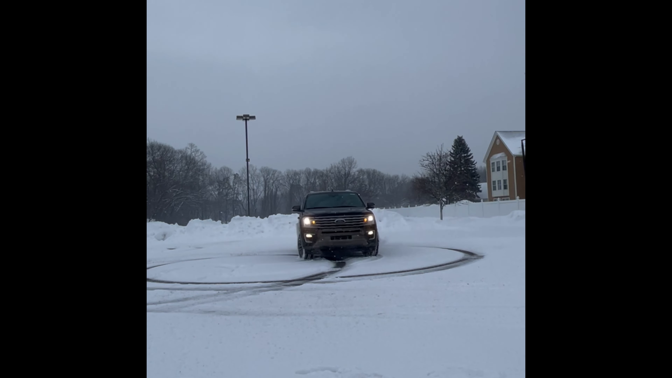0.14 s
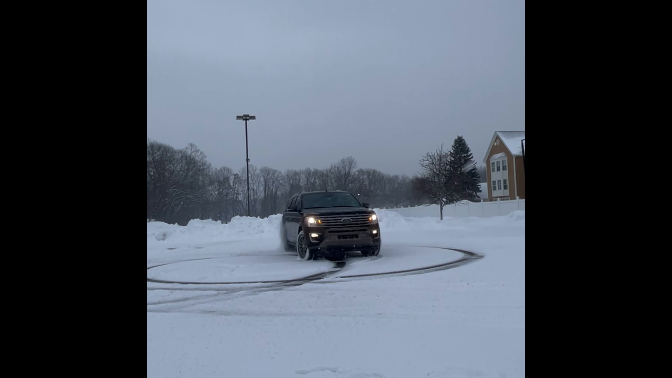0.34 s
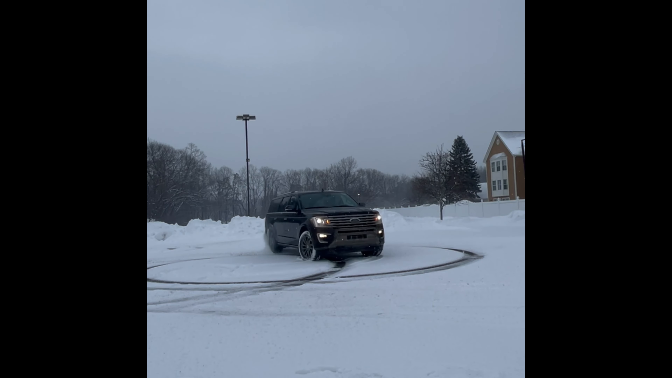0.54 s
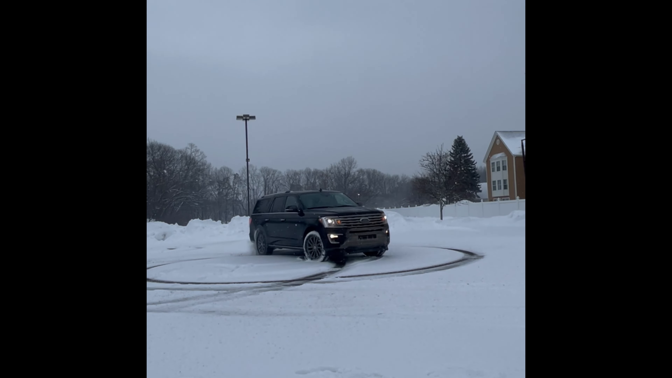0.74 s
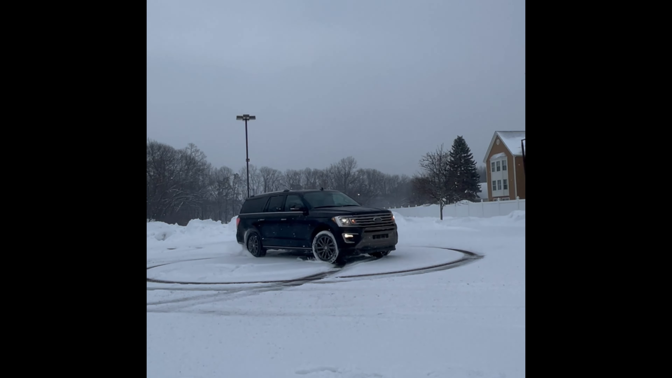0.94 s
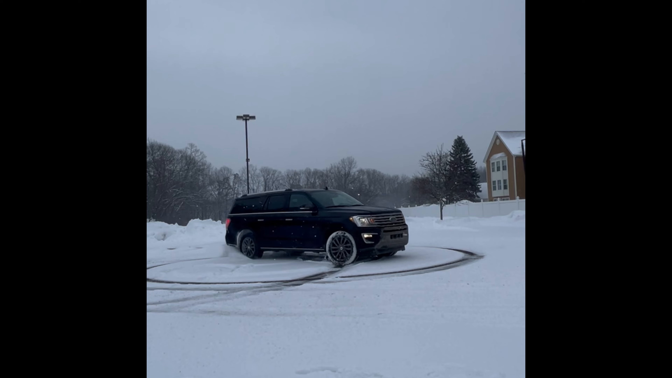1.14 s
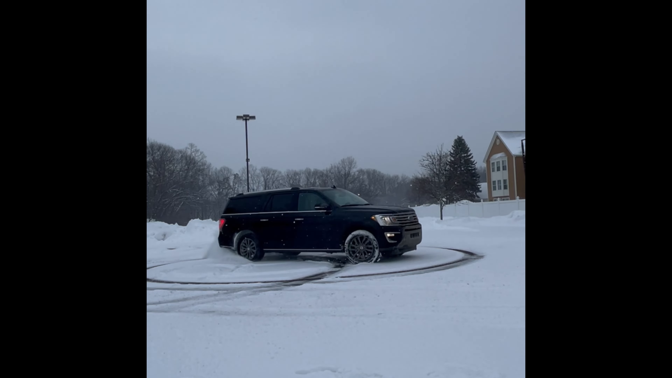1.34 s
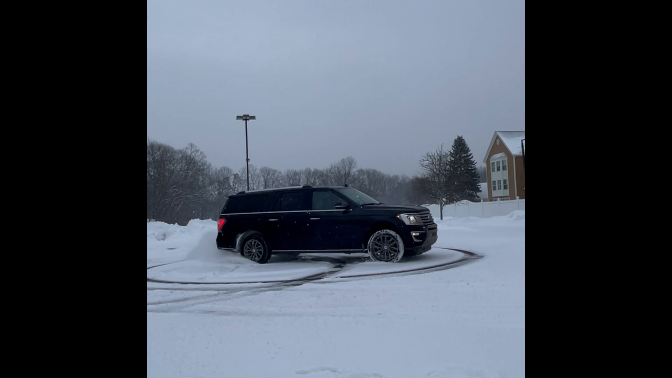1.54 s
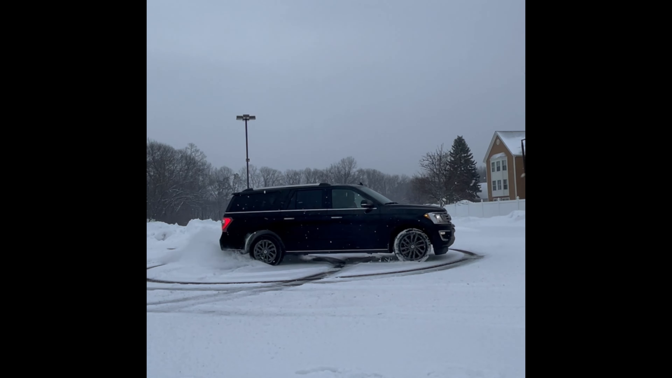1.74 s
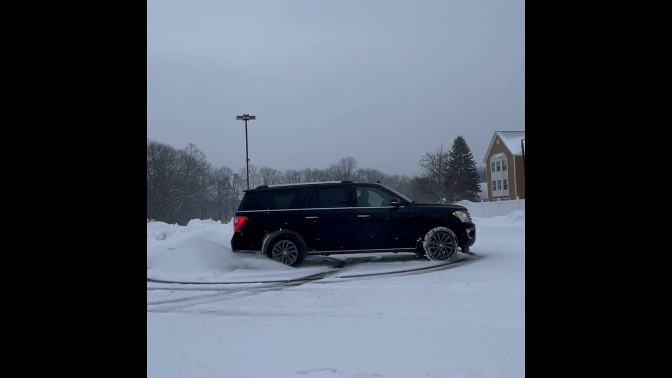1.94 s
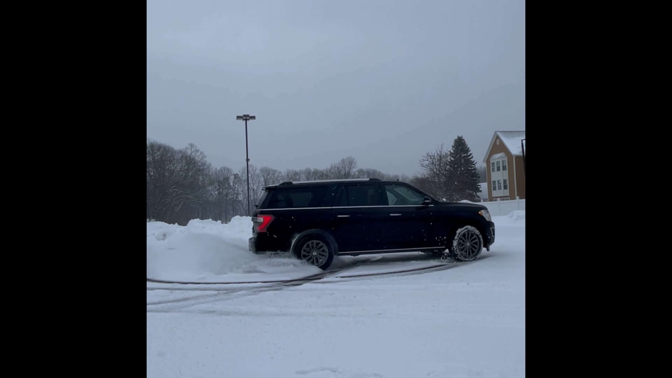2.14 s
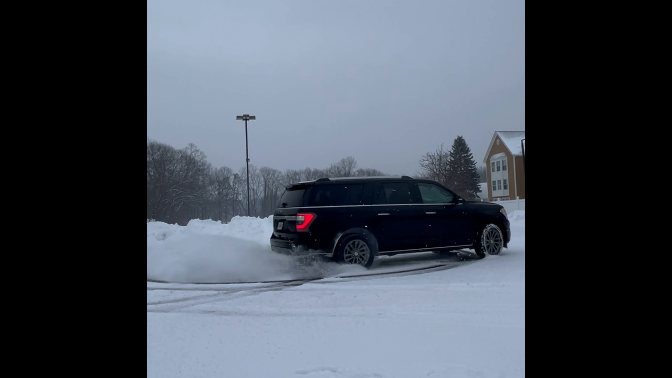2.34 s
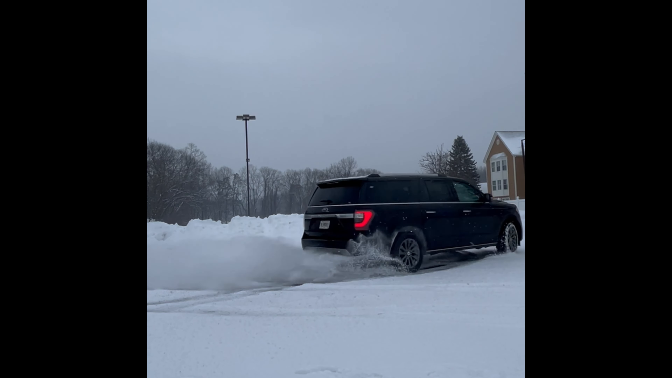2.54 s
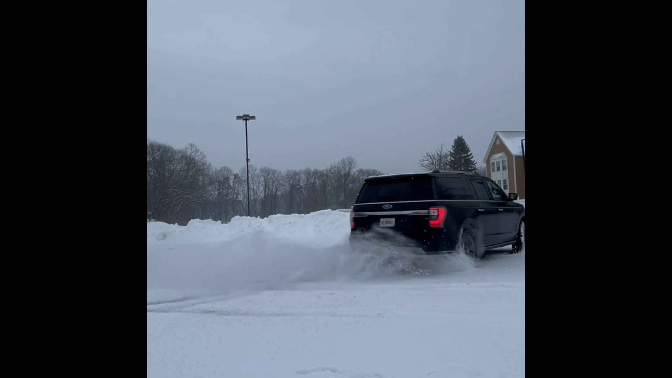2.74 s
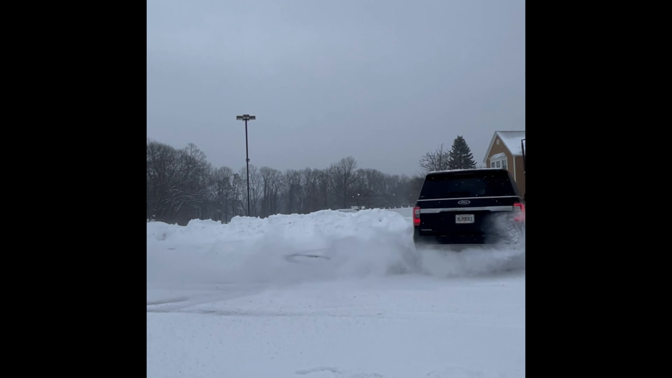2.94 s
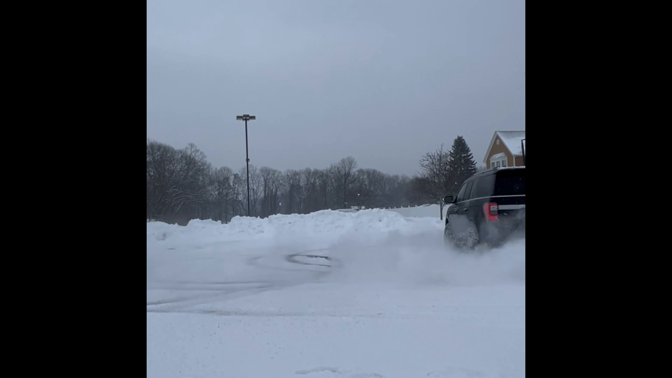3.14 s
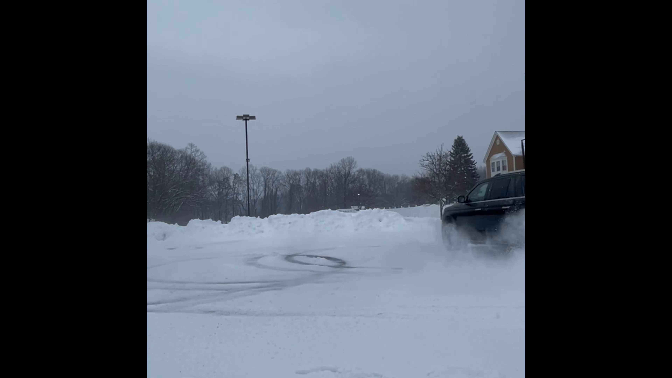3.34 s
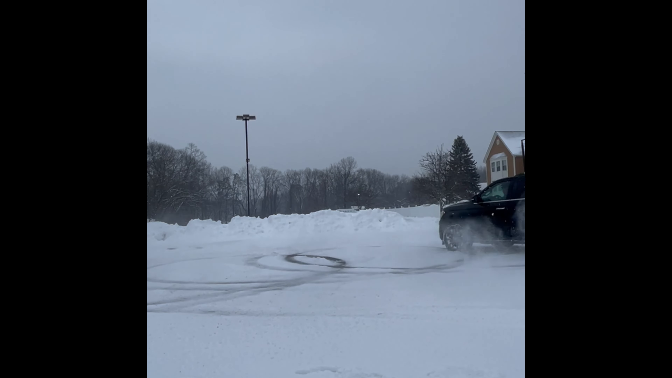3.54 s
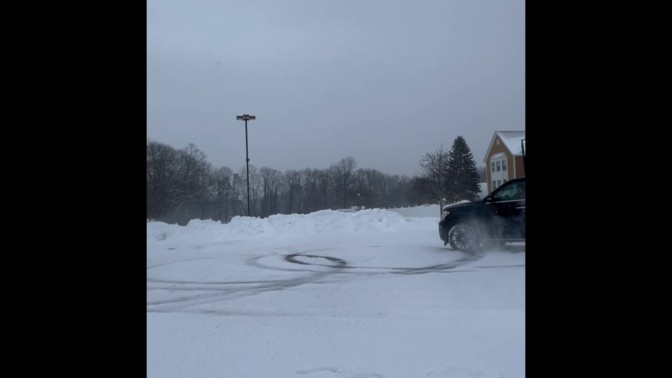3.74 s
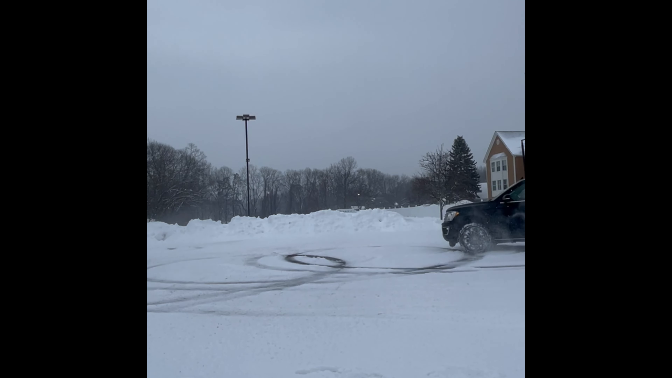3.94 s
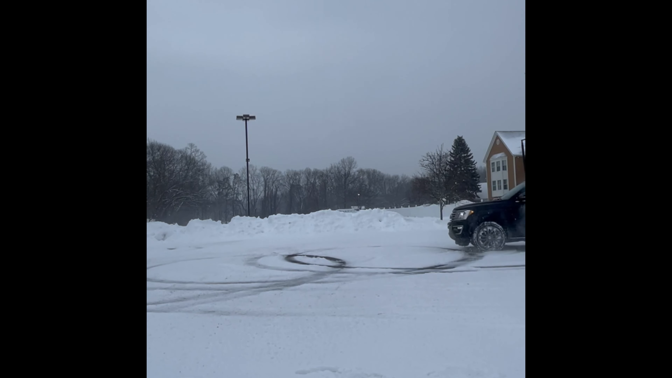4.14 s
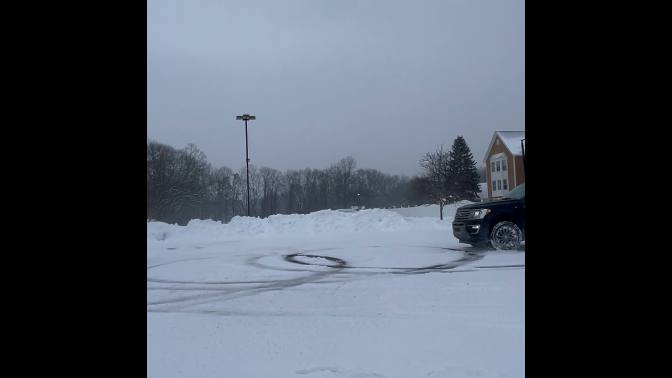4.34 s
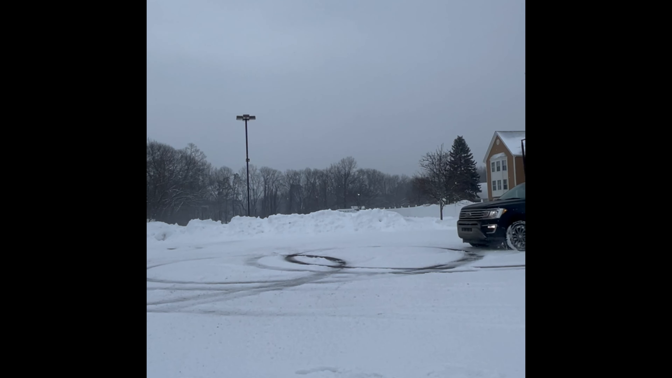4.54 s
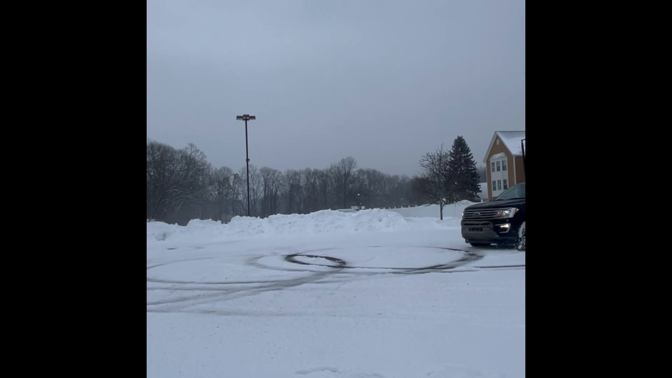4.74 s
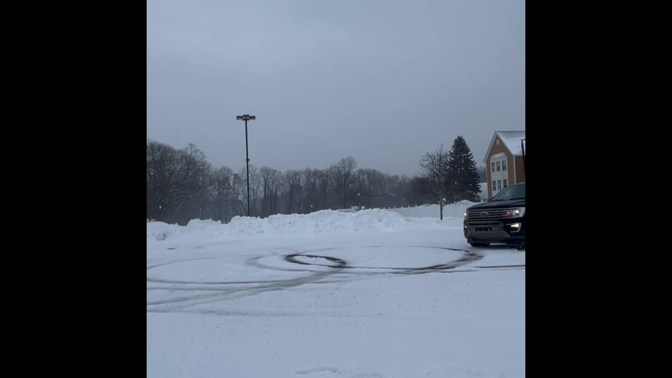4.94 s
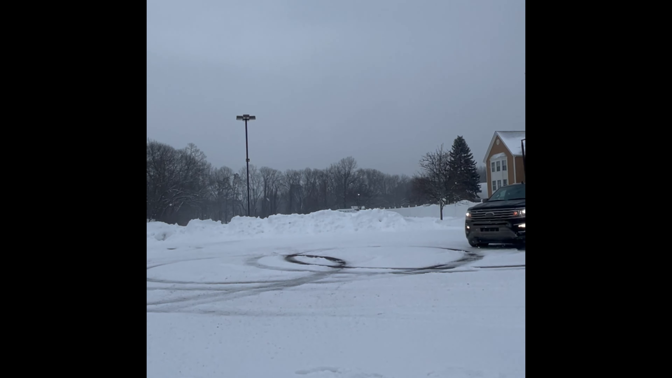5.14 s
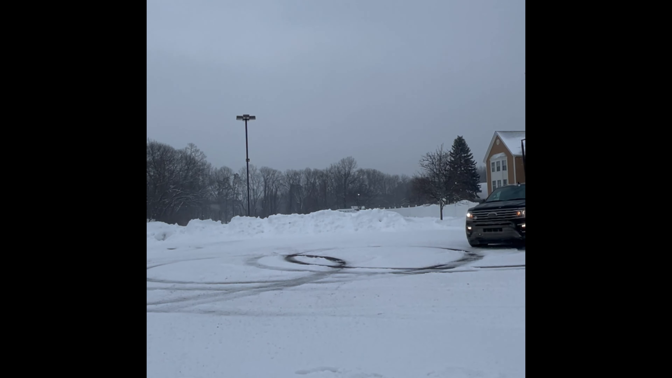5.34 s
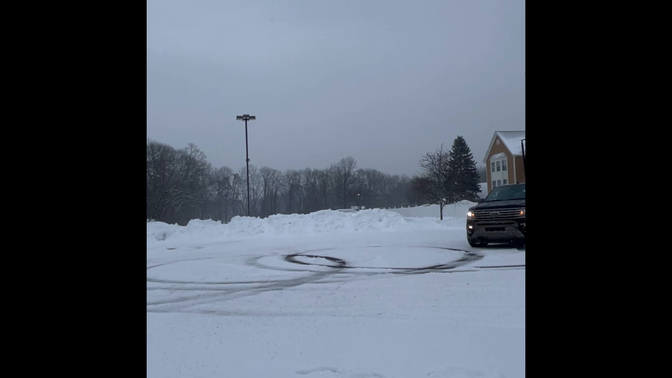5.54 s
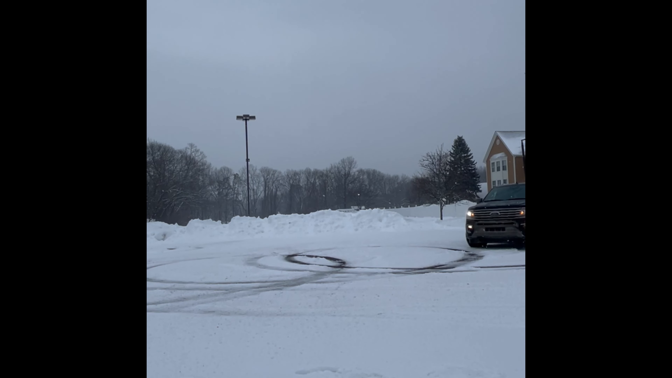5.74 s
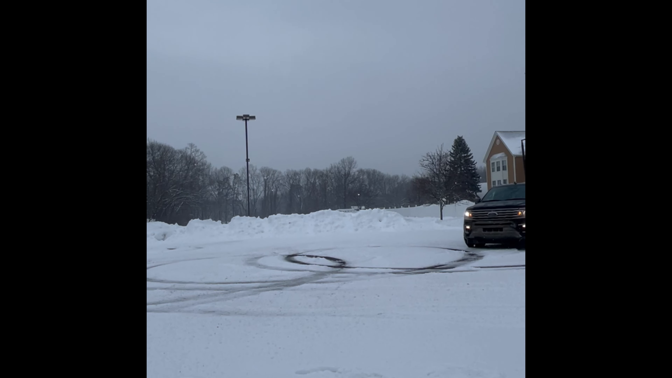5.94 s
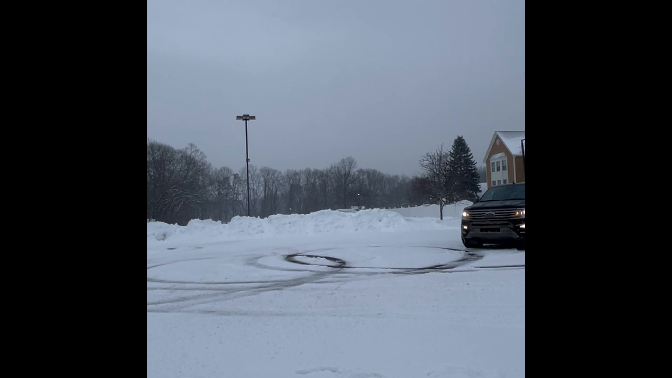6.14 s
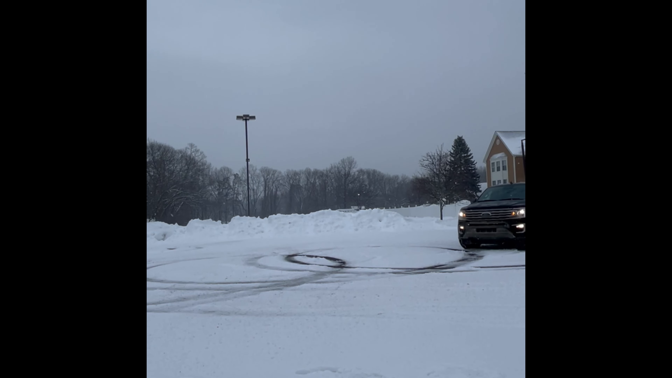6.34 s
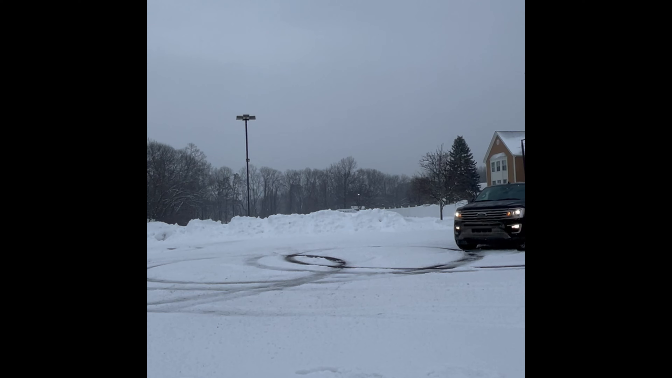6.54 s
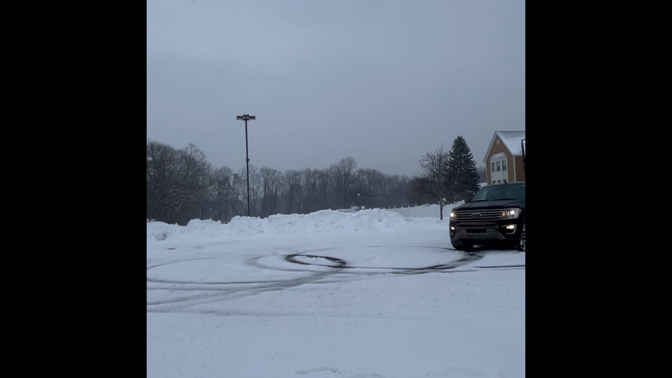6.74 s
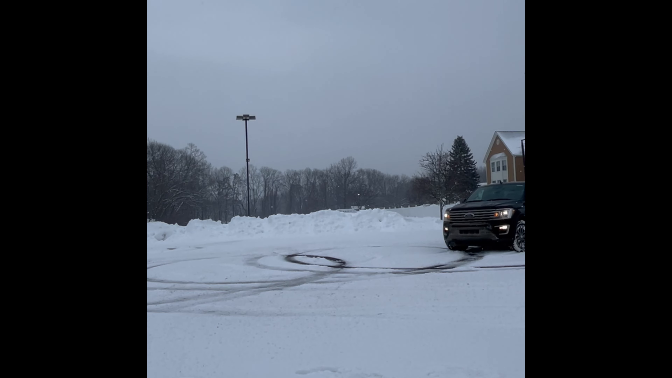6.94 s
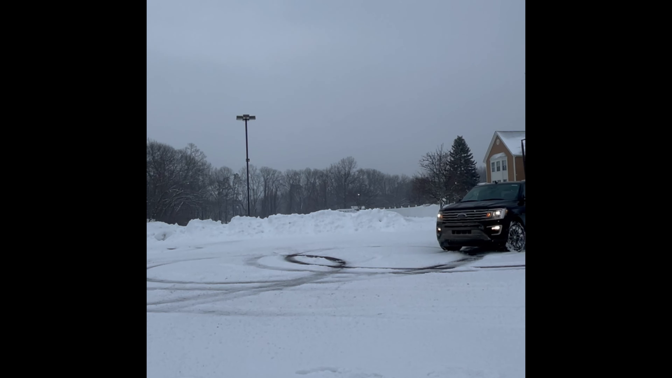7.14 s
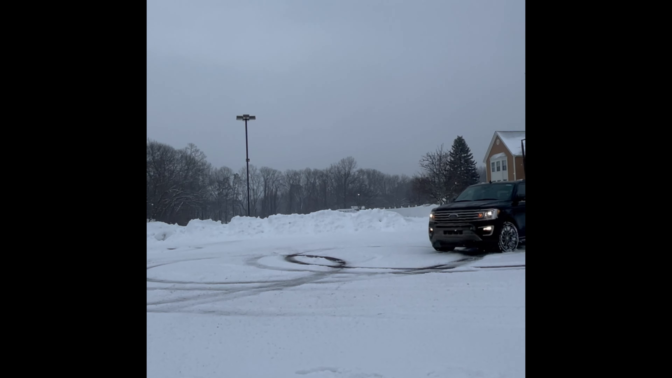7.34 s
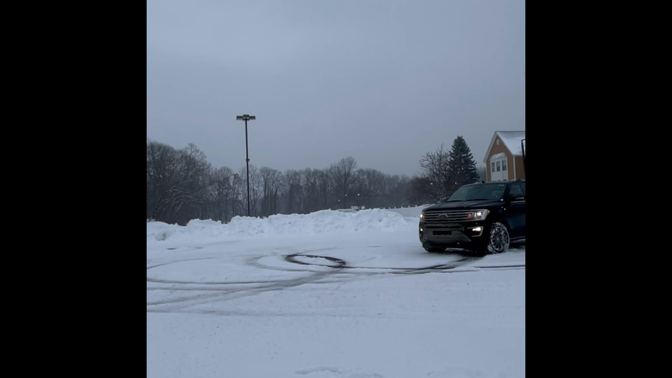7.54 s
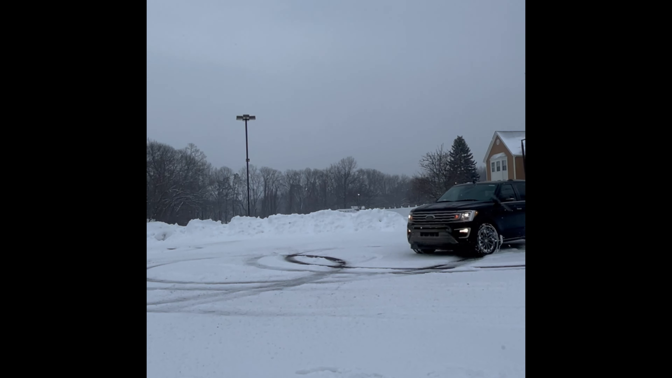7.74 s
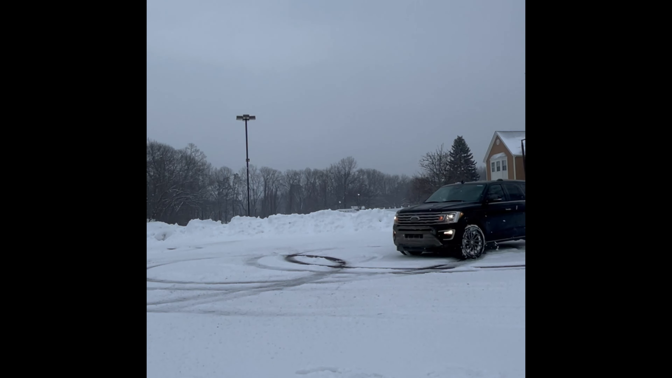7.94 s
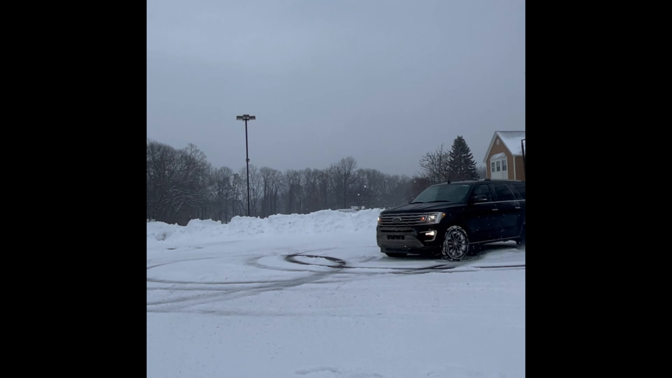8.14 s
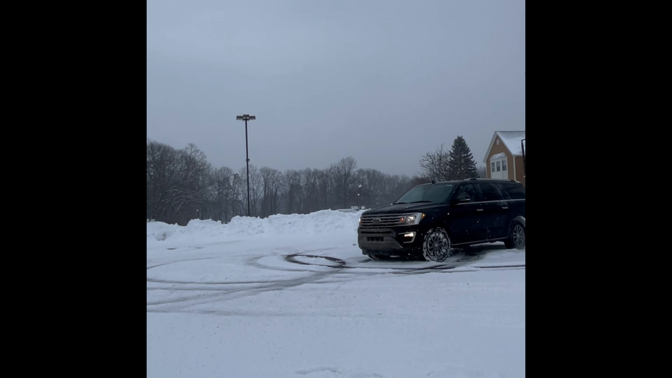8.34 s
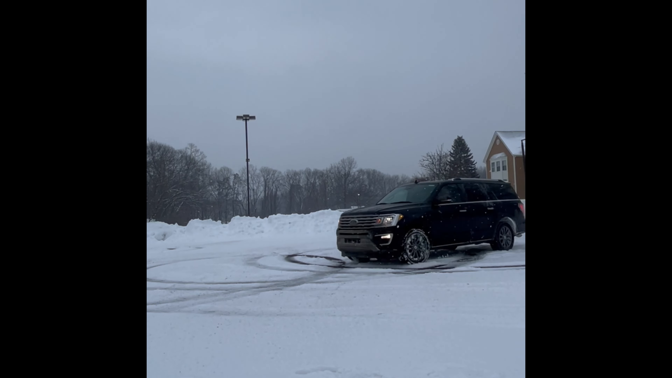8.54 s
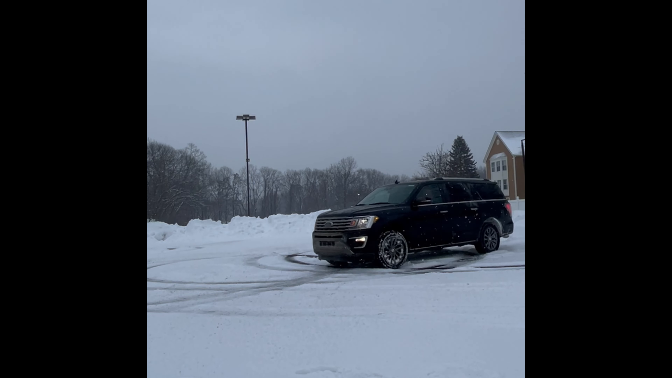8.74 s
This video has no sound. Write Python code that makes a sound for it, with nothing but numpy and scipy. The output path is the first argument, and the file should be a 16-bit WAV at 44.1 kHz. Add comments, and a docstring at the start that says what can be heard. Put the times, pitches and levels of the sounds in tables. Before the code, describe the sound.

Outdoors in snow, a big engine growls as spinning tyres scrub and squeal briefly, brakes to a low hum, surges once more and drops away.

```python
"""A snowy car park: a heavy six-cylinder car slides in circles near a phone, brakes to a stop, pulls off again.
The engine is a stack of tones tied to its firing rate, with gas noise pulsing along.
Tyres on snow are bands of flickering noise; where they bite wet asphalt, short gliding tones squeal.
A turbo whistles very high, as thin wavering tones; wind buffets the two microphone ports, as low noise."""
import sys
import numpy as np
from scipy import signal
from scipy.fft import rfft, irfft
from scipy.io import wavfile
from scipy.ndimage import uniform_filter1d, map_coordinates

SR = 44100
rng = np.random.default_rng(int(sys.argv[2]) if len(sys.argv) > 2 else 0)


def transcribe(signal):
    """Save signal, clipped to [-1, 1], as a 16-bit WAV file at the path in sys.argv[1]."""
    frames = np.atleast_2d(signal).T
    limited = np.clip(frames, -1, 1)
    pcm = np.round(limited * 32767).astype(np.int16)
    wavfile.write(sys.argv[1], SR, pcm)


N = 388080

# Engine: (time [s], firing rate [Hz], level at the firing rate [dB], at twice it [dB],
# at one and a half times it [dB], growl: base level of the lines above twice it [dB])
ENGINE_CURVE = [(0, 93.8, -34, -51, -55, -49.5), (.2, 92, -30.5, -47, -50, -51.5),
                (.4, 90.2, -37, -46, -49, -50), (.8, 88.8, -28, -38, -47.5, -53.5),
                (1.2, 89.1, -25.5, -40.5, -59, -53), (1.47, 90.54, -30, -47, -48, -49),
                (1.64, 92.1, -25, -38, -51, -54), (1.82, 93.7, -40, -52, -52, -49),
                (2.2, 127.5, -66, -49, -58, -48.5), (2.55, 116.5, -43, -38, -65, -48.5),
                (2.99, 107.6, -25, -48, -40, -60), (3.53, 108, -26, -37, -40, -47.5),
                (3.68, 112.5, -34, -46, -43, -69), (3.93, 122.1, -31.5, -53, -55, -63),
                (4.02, 125, -36, -36.5, -50, -66), (4.21, 123.5, -34.5, -38.5, -49, -64),
                (4.3, 121.3, -36, -44, -50, -64), (4.4, 116.3, -35, -42, -42, -53),
                (4.53, 106.2, -29.5, -42, -47, -52.5), (4.65, 94.15, -32.5, -42, -54, -67),
                (4.78, 81.6, -23.5, -44.5, -54, -67), (4.97, 74.3, -38, -42.5, -46, -79),
                (5.29, 56.53, -37, -61, -33, -55.5), (5.42, 60.93, -35, -64, -30, -50.5),
                (5.55, 67, -34, -66, -34, -52.5), (5.73, 73.37, -26, -67, -30.5, -62),
                (6.2, 76.6, -31, -67, -37, -58), (6.32, 72, -30.5, -58, -79, -59),
                (6.79, 104.8, -26, -50, -46, -56.5), (6.93, 110.3, -34, -43, -49, -55),
                (7.13, 120.2, -39.5, -49, -53, -47.5), (7.27, 125.1, -37, -38, -45, -46),
                (7.4, 128.2, -32, -33, -50, -46.5), (7.55, 122.4, -36.5, -38, -48, -47),
                (7.65, 115.9, -37.5, -50, -59, -49), (7.74, 105, -29.5, -46, -57, -47),
                (7.87, 91.6, -34, -48, -57, -53), (8.01, 86.2, -35, -39.5, -60, -55),
                (8.23, 75.2, -42, -37.5, -60, -58), (8.43, 67.64, -39, -40, -62, -58),
                (8.52, 62, -48, -33.5, -60, -57), (8.65, 49.3, -48, -37, -57, -49),
                (8.8, 40.5, -55, -44, -49, -54)]
# Exhaust pipe colouring of the growl: (pitch [Hz], gain [dB])
PIPE_COLOUR = [(150, 4), (270, 2), (340, -3), (370, -4), (400, -2), (450, -2), (510, 1), (550, -2),
               (640, -1), (750, 1), (1100, -8)]
# Growl lines, in thirds of the firing rate (three firings a turn)
GROWL_THIRDS = np.arange(7, 25)
# Level of each growl line over the base: (level [dB])
GROWL_LINE_DB = [-9, -4, 1, -6, -7, 2, -9, -9, -1, -5, -6, 0, -6, -3, -1, -6, -4, -1]
DULL_BELOW_HZ, DULL_DB_PER_HZ = 86, -0.3  # slow firing dulls orders above the third, more for higher ones
LINE_DRIFT_HZ, LINE_SWELL_DB = 2.5, 4  # each growl line strays in pitch, and swells and fades on its own

# Sliding tyres: (time [s], scrub level [dB], rasp over scrub [dB], thrown snow over scrub [dB],
# treble over scrub [dB], left minus right [dB], of which only the swing about its mean is heard)
TYRE_CURVE = [(0, -39, -6, -10.5, -15.5, 2.9), (.6, -36.5, -4, -11.5, -19, 3.6),
              (1.1, -38, -3, -12.5, -17.5, 3.7), (1.6, -35, -6, -10.5, -16.5, 2.9),
              (1.9, -30, -2.5, -14.5, -18, 3.3), (2.17, -26, -1.5, -10, -15.5, 3.5),
              (2.4, -28, -1.5, -12, -12, 4.2), (2.7, -30.5, -1.5, -11.5, -19.5, 3.7),
              (3.1, -30, -13.5, -8.5, -20.5, 4.1), (3.35, -32, -4.5, 1.5, -12.5, 3.9),
              (3.52, -33.5, -1.5, 5.5, -5, 3.3), (3.67, -36.5, -7, 8.5, -7.5, 2.8),
              (3.8, -34, -12, 0, -7, 1.97), (3.94, -32.5, -15, -2, -12.5, 1.1),
              (3.98, -34, -19, -7, -14, 2.4), (4.45, -34, -11, -1, -13.5, 1.9),
              (4.85, -34.5, -19, -5.5, -19, 1.2), (4.97, -43, -19, -7, -10, 1.4),
              (5.03, -48.5, -11, 0, -15, 1.5), (5.14, -48, -17, -11, -18.5, 2.56),
              (5.32, -53.5, -10, -10, -18, 4.35), (5.95, -49, -21, -10.5, -14, 3.4),
              (6.3, -44, -19, -15, -15, 2.7), (6.7, -38.5, -11, -10.5, -15.5, 2.3),
              (7.4, -32, -13.5, -10, -18, 3.5), (7.9, -36.5, -13.5, -12, -21.5, 3.9),
              (8.8, -48, -12, -14, -22.5, 4.9)]
# Noise bands of each tyre sound: (centre [Hz], width [Hz], level within that sound before scaling [dB])
SCRUB_BANDS = [(1436, 556, 3.5), (1827, 343, 2)]
CHURN_BANDS = [(592, 102, -5), (853, 380, 8), (1080, 226, 5.5)]
RASP_BANDS = [(2160, 610, 0)]
SPRAY_BANDS = [(2930, 510, 3), (3393, 340, 1.5), (3690, 440, 4)]
HISS_BANDS = [(4420, 390, 0), (4804, 560, -4.5), (5620, 270, -15), (6365, 750, -9)]
FINE_SNOW_BANDS = [(7600, 1700, 2.5), (9300, 2000, 0), (11400, 2400, -5), (13600, 2400, -9)]
CHURN_DB, HISS_DB = -1, 4  # over scrub, when the levels they follow are at 0 dB
# Shares of the thrown-snow, rasp and treble levels that churn and hiss follow
CHURN_FOLLOWS_SNOW, CHURN_FOLLOWS_RASP = 0.26, -0.065
HISS_FOLLOWS_SNOW, HISS_FOLLOWS_RASP, HISS_FOLLOWS_TREBLE = 0.083, 0.31, 0.68
# A tyre bites through to asphalt: (peak time [s], length [s], rise of scrub [dB],
# share of that rise reaching churn [ratio], share reaching the snow [ratio])
ASPHALT_BITES = [(0.182, 0.23, 1, 1, 6), (0.738, 0.16, 11.5, 0.33, 0.5), (0.803, 0.06, 2, 4, .3),
                 (1.151, 0.34, 5, 0, .5), (1.318, 0.21, 4.5, 0.8, 2.4), (1.434, 0.35, 7, 0, 0.56),
                 (1.613, 0.064, 1.5, -8, -0.5), (2.259, 0.13, 9.5, 0.67, 1), (2.516, 0.17, 8.5, 1.1, 1.52),
                 (2.632, 0.2, 6, 0, .5), (2.826, 0.18, 3, .5, -1), (2.958, 0.13, 1, 1.5, 2),
                 (2.97, 0.024, 3.5, 3, 1), (3.515, 0.12, 0.5, 3, 1.5), (3.633, .12, 2, 1.5, 1),
                 (3.716, .08, 2.5, 1, 0.5), (3.919, 0.081, 2, -0.5, 2.5), (4.09, 0.024, 2, 5.5, 1),
                 (4.279, 0.17, 6.5, 0.5, 0.3), (4.455, 0.07, 1.5, -7, 4), (4.588, 0.16, 3, -2, 0.9),
                 (4.742, 0.3, 7, -0.5, 0.5), (7.794, 0.25, 0.5, 8, 4), (8.21, 0.2, 1, 6, -2),
                 (8.482, 0.093, 1.5, 5, 3)]

# Low rumble: (time [s], wind buffet level [dB], roar of body and exhaust gas [dB])
RUMBLE_CURVE = [(0, -32, -46), (.44, -35, -43), (1.1, -31, -37), (1.6, -25.5, -36), (1.9, -24, -28.5),
                (2.3, -27, -26), (2.5, -34.5, -28.5), (2.6, -49, -28.5), (2.95, -38, -25),
                (3.25, -42, -23.5), (3.5, -31, -31), (3.75, -35.5, -30.5), (4.2, -32.5, -37),
                (4.7, -33.5, -42), (5.2, -37, -51.5), (6.2, -34.5, -49), (6.8, -31.5, -37),
                (7.85, -28.5, -42.5), (8.05, -34.5, -45), (8.8, -38.5, -43.5)]
# Gusts thump the ports: (peak time [s], length [s], rise of wind [dB], rise of roar [dB])
WIND_GUSTS = [(0.89, 0.33, 6, -1), (1.22, 0.06, 10, 3), (1.516, 0.092, 5, 6.5), (2.144, 0.15, 9.5, 0),
              (2.237, 0.045, 9, 8.5), (2.516, 0.069, 15.5, -5), (3.174, 0.21, 15, -0.5),
              (3.926, 0.082, 14, 1), (4.345, 0.18, 7.5, 10.5), (4.622, 0.11, 8.5, 0),
              (4.872, 0.071, 14.5, 3), (5.828, 0.11, 10.5, 15.5), (6.314, 0.12, 9, -1),
              (6.458, 0.059, 10, -2), (6.551, 0.17, 6.5, 1), (6.714, 0.073, 5, 2), (7.329, 0.076, 2, 5),
              (7.504, 0.083, -1, -1), (7.966, 0.053, 12.5, -5)]
APART_DB, APART_SWING_DB = -11, 4  # wind that differs between the ports, and how much it wanders

# Turbo, one table for each spool-up: (time [s], pitch [Hz], level [dB])
TURBO_SPOOLS = [
    [(0, 12900, -64), (.5, 13350, -62), (1.2, 13100, -66), (1.7, 13500, -63), (2.15, 13900, -64)],
    [(5.75, 7400, -78), (6.05, 8700, -64), (6.35, 12300, -65), (6.8, 13600, -60), (7.15, 14150, -60),
     (7.4, 13600, -61), (7.55, 12500, -64), (7.73, 10700, -65), (7.9, 8500, -73)],
]
# Pitch scatter of each spool-up: (share of pitch [ratio])
TURBO_SCATTER = [.014, .012]

# Tread blocks stick and slip in short chirps: (peak time [s], length [s], start pitch [Hz],
# end pitch [Hz], level [dB], pitch scatter as a share [ratio])
TREAD_CHIRPS = [(0.692, 0.037, 1520, 1069, -27, 0.038), (0.744, 0.089, 1063, 972, -20.5, 0.027),
                (0.769, 0.051, 1370, 2010, -26, 0.05), (0.705, 0.05, 1510, 1964, -26, 0.06),
                (0.742, 0.043, 2350, 2610, -33, 0.036), (0.746, 0.05, 2020, 2000, -28, 0.035),
                (0.723, 0.052, 1610, 2000, -30, 0.083), (0.804, 0.038, 1004, 1036, -23.5, 0.018),
                (0.834, 0.045, 1060, 1057, -34, 0.025), (0.865, 0.04, 1046, 1036, -39, 0.02),
                (1.289, 0.037, 1000, 1000, -31, 0.03), (1.314, 0.035, 1990, 2000, -28.5, 0.015),
                (1.342, 0.074, 990, 1047, -28, 0.033), (1.39, 0.06, 1020, 1020, -34, 0.076),
                (1.35, 0.05, 1580, 1600, -33, 0.026), (1.423, 0.057, 1016, 1037, -23, 0.045),
                (1.432, 0.058, 1850, 1780, -34, 0.03), (1.491, 0.1, 1034, 1025, -26, 0.045),
                (1.545, 0.06, 1027, 993, -40, 0.045), (1.596, 0.062, 982, 1020, -34, 0.035),
                (1.647, .06, 957, 970, -38, .03), (1.706, 0.13, 1022, 1038, -32.5, 0.014),
                (2.238, 0.04, 1554, 1415, -25, 0.068), (2.255, 0.048, 2400, 1843, -26, 0.05),
                (2.26, 0.048, 3650, 3350, -29, 0.057), (2.481, 0.054, 3615, 3450, -24.5, 0.04),
                (2.492, 0.055, 2500, 2260, -23, 0.04), (2.271, 0.051, 1231, 1156, -19.5, 0.13),
                (2.298, 0.071, 1149, 1057, -17.5, 0.15), (2.523, 0.043, 1203, 1152, -17, 0.14),
                (2.587, 0.075, 1090, 1101, -24, 0.115), (2.669, 0.096, 1089, 1044, -23.5, 0.14),
                (4.644, .125, 1155, 1031, -26.5, 0.02), (4.72, 0.029, 1060, 1050, -30, .025),
                (4.768, .04, 1002, 990, -21.5, 0.025), (4.807, 0.06, 982, 970, -23, 0.029),
                (4.859, 0.042, 974, 957, -21.5, 0.023), (4.897, 0.045, 936, 902, -26, .018),
                (4.932, 0.031, 932, 890, -26, 0.024), (4.963, 0.047, 875, 847, -28, 0.017),
                (4.993, 0.025, 897, 930, -34, 0.03), (4.735, 0.065, 1850, 1595, -29, 0.067),
                (4.795, 0.053, 1590, 1475, -29, 0.04), (4.83, 0.023, 1511, 1510, -27, .04),
                (5.043, 0.1, 901, 878, -44.5, 0.082), (7.794, 0.17, 1124, 1102, -33.5, 0.07),
                (8.491, 0.088, 897, 892, -42, 0.046)]
CHIRP_EDGE_DB, CHIRP_SHOULDER_DB = -11, -3  # at both ends of a chirp, and a fifth of the way in
OVERTONE_DB, OVERTONE_SCATTER = -15, .12  # rough octave above the chirps, before filtering; added scatter
# Faint squeaks of other tread blocks at random: pitch and length are ranges, level is over scrub
SQUEAK_COUNT, SQUEAK_HZ, SQUEAK_S = 260, (800, 4200), (.03, .09)
SQUEAK_DB, SQUEAK_SPREAD_DB = -9, 6

# A low hum rises briefly, perhaps wind or a wheel, as the engine slows:
# (time [s], pitch [Hz], level before a gain of 0.76 [dB])
BRIEF_LOW_HUM = [(7.3, 56.9, -46), (7.5, 68.32, -22), (7.7, 79, -56), (7.95, 83.8, -48)]
# A short dull knock, perhaps the suspension: (time [s], pitch [Hz], level before a gain of 0.76 [dB])
DULL_KNOCK = [(8.0, 345.7, -59), (8.03, 322.6, -28.5), (8.06, 303.7, -52)]

# Timing between the ports: (pitch [Hz], phase by which left leads [rad])
PORT_LEAD = [(0, 0), (520, -0.0), (1030, -0.9), (2670, -0.2), (3880, -0.6), (4570, -1.3), (5250, -5.5),
             (6630, -4.8), (6980, -3.4), (8180, -3.1), (10400, -0.2), (12300, 0.2), (13200, 3.0),
             (15500, 3.3)]
# Loudness between the ports: (pitch [Hz], left minus right [dB])
PORT_TILT = [(170, 0), (400, 3), (690, 7), (1200, 4.5), (1720, 2), (2240, -2), (2760, 1), (4300, 3),
             (4820, -2), (5400, 1), (7500, 0)]
DIFFUSE_DB, DIFFUSE_TREBLE_DB = -12, 1  # scattered sound, and the extra treble fed into it
TOP_HZ = 15720  # the phone passes nothing much above this


def undb(db):
    """Turn a level in dB into a gain."""
    return 10 ** (np.asarray(db) / 20)


def unit(x):
    """Scale a sound to an average (rms) strength of 1."""
    return x / np.sqrt(np.mean(x ** 2))


def columns(table):
    """Draw every column of a timed table as straight lines over all samples."""
    s, *rest = np.transpose(table)
    return [np.interp(np.arange(N) / SR, s, c) for c in rest]


def by_pitch(hz, table):
    """Read a (pitch, value) table at any pitch, in equal musical steps, not below 20 Hz."""
    pitch, value = np.transpose(table)
    return np.interp(np.log(np.maximum(hz, 20)), np.log(np.maximum(pitch, 20)), value)


def band(x, hz, width):
    """Keep only a band around one pitch, like a resonance with steep sides."""
    edges = [max(hz - width / 2, 10), min(hz + width / 2, .49 * SR)]
    return signal.sosfilt(signal.butter(2, edges, "bandpass", fs=SR, output="sos"), x)


def walk(rate):
    """Wander at random: new values `rate` times a second, smoothed twice; spread near 1."""
    k = max(int(SR / rate), 1)
    steps = np.repeat(rng.standard_normal(N // k + 1), k)
    return 1.275 * uniform_filter1d(uniform_filter1d(steps, k), k)[:N]


def tone(hz):
    """Sine of rms 1 that follows a pitch curve."""
    return np.sqrt(2) * np.sin(2 * np.pi * np.cumsum(hz) / SR)


def bumps(peak_s, length_s, rise):
    """One row for each event: 0 outside, a triangle up to 1 at the peak."""
    from_peak = np.arange(N) / SR - np.asarray(peak_s)[:, None]
    length_s = np.asarray(length_s)[:, None]
    going_up = 1 + from_peak / (rise * length_s)
    going_down = 1 - from_peak / ((1 - rise) * length_s)
    return np.clip(np.minimum(going_up, going_down), 0, 1)


def notes(tables, wavers, drift, throb):
    """Wavering, throbbing tones that fade in and out over 10 ms."""
    out = np.zeros(N)
    for table, waver in zip(tables, wavers):
        s, hz, db = np.transpose(table)
        span = np.arange(int(s[0] * SR), int(s[-1] * SR))
        t = span / SR
        gate = np.clip(np.minimum(t - s[0], s[-1] - t) / .01, 0, 1)
        pitch = np.interp(t, s, hz) * (1 + waver * drift[span])
        out[span] += gate * undb(np.interp(t, s, db)) * tone(pitch)
    return out * throb


def engine():
    """Exhaust tones at multiples of the firing rate; uneven firings make each waver in level and pitch."""
    hz, first_db, second_db, half_db, growl_db = columns(ENGINE_CURVE)
    hz = hz * (1 + .0012 * walk(30))
    hum = np.zeros(N)
    for k, db in [(1, first_db), (1.5, half_db), (2, second_db)]:
        hum += undb(db + 1.2 * k * walk(20) + 2 * walk(4)) * tone(k * hz)
    dull_db = DULL_DB_PER_HZ * np.maximum(DULL_BELOW_HZ - hz, 0)
    for k, line_db in zip(GROWL_THIRDS / 3, GROWL_LINE_DB):
        db = growl_db + line_db + by_pitch(k * hz, PIPE_COLOUR) + dull_db * max(k - 3, 0)
        swell_db = LINE_SWELL_DB * walk(4) + 2.5 * walk(25)
        # straying pitch keeps the lines from locking into a tick
        hum += undb(db + swell_db) * tone(k * hz + LINE_DRIFT_HZ * walk(12))
    gas_pulse = 1 + 0.098 * tone(hz)  # firing pressure, used to pulse the roar
    return hum, gas_pulse


def crunch(modes, shared_db):
    """Dense snow grains of uneven size ring each band; bands flicker together and alone."""
    size = undb(shared_db + 1.2 * walk(400))
    mix = np.zeros(N)
    for hz, width, db in modes:
        grains = rng.standard_normal(N) * size
        mix += undb(db + .7 * walk(14)) * unit(band(grains, hz, width))
    return unit(mix)


def tyres():
    """Scrub, churn, rasp, spray, hiss and fine snow of the sliding tyres, changed in level by bites."""
    scrub_db, rasp_db, snow_db, treble_db, _ = columns(TYRE_CURVE)
    s, length, rise_db, to_churn, to_snow = np.transpose(ASPHALT_BITES)
    shape = bumps(s, length, 0.51)
    bite_db = rise_db @ shape
    churn_bite_db = (rise_db * to_churn) @ shape
    snow_bite_db = (rise_db * to_snow) @ shape
    churn_db = CHURN_DB + CHURN_FOLLOWS_SNOW * snow_db + CHURN_FOLLOWS_RASP * rasp_db
    hiss_db = HISS_DB + HISS_FOLLOWS_SNOW * snow_db + HISS_FOLLOWS_RASP * rasp_db
    hiss_db = hiss_db + HISS_FOLLOWS_TREBLE * treble_db
    layers = [(SCRUB_BANDS, bite_db),
              (CHURN_BANDS, churn_db + churn_bite_db),
              (RASP_BANDS, rasp_db + (bite_db + snow_bite_db) / 2),
              (SPRAY_BANDS, snow_db + snow_bite_db),
              (HISS_BANDS, hiss_db + snow_bite_db),
              (FINE_SNOW_BANDS, treble_db + 0.74 * snow_bite_db)]
    shared_db = .8 * walk(60) + .6 * walk(14)
    mix = sum(undb(db + 0.16 * walk(8.6)) * crunch(modes, shared_db) for modes, db in layers)
    return undb(scrub_db) * mix


def rumble():
    """Roar reaches both ports alike; wind pushes them together, with quick eddies that differ and reach higher."""
    wind_db, roar_db = columns(RUMBLE_CURVE)
    s, length, wind_rise_db, roar_rise_db = np.transpose(WIND_GUSTS)
    shape = bumps(s, length, 0.46)
    wind_db = wind_db + wind_rise_db @ shape
    roar_db = roar_db + roar_rise_db @ shape
    roar = unit(band(rng.standard_normal(N), 192, 193) + 0.34 * band(rng.standard_normal(N), 312, 295))
    wind = unit(band(rng.standard_normal(N), 68, 37) + 0.35 * band(rng.standard_normal(N), 110, 76))
    eddy = rng.standard_normal(N) * undb(5 * walk(35))
    high_eddy = rng.standard_normal(N) * np.abs(eddy)
    apart = unit(band(eddy, 100, 85) + 0.22 * band(high_eddy, 400, 600))
    apart = apart * undb(APART_DB + APART_SWING_DB * walk(5))
    both_winds = wind + apart * np.array([[1], [-1]])  # eddies push the ports opposite ways
    return undb(roar_db + 1.5 * walk(11)) * roar, undb(wind_db) * both_winds


def turbo():
    """The turbo's whistle: one very high tone for each spool-up, trembling in pitch and level."""
    return notes(TURBO_SPOOLS, TURBO_SCATTER, walk(300), undb(1.5 * walk(40)))


def squeaks():
    """Rows for faint random chirps, set by the scrub level; higher ones also follow the thrown snow."""
    when, pitch, loud, long, glide = rng.random((SQUEAK_COUNT, 5)).T
    s = .05 + (N / SR - .1) * when
    hz = SQUEAK_HZ[0] * (SQUEAK_HZ[1] / SQUEAK_HZ[0]) ** pitch
    t, scrub_db, _, snow_db, *_ = np.transpose(TYRE_CURVE)
    db = np.interp(s, t, scrub_db) + (hz > 2500) * np.interp(s, t, snow_db)
    db = db + SQUEAK_DB + SQUEAK_SPREAD_DB * (loud - .5)
    length = SQUEAK_S[0] + (SQUEAK_S[1] - SQUEAK_S[0]) * long
    scatter = np.full(SQUEAK_COUNT, .02)
    return np.transpose([s, length, hz, hz * (.92 + .14 * glide), db, scatter])


def squeal():
    """Sticking and slipping tread: each chirp swells and dies, gliding, with a rougher octave on top."""
    rows = np.vstack([TREAD_CHIRPS, squeaks()])
    # (share of the chirp's length, level in dB)
    shape = [(0, CHIRP_EDGE_DB), (.2, CHIRP_SHOULDER_DB), (.5, 0), (.8, CHIRP_SHOULDER_DB), (1, CHIRP_EDGE_DB)]
    tables = np.array([[(s + length * (u - .5), hz + (end_hz - hz) * u, db + shape_db) for u, shape_db in shape]
                       for s, length, hz, end_hz, db, _ in rows])
    scatter = rows[:, -1]
    chirps = notes(tables, scatter, walk(260), undb(1.5 * walk(50) + 3 * walk(170)))
    octave_throb = undb(OVERTONE_DB + 4 * walk(80))
    octave = notes(tables * [1, 2, 1], scatter + OVERTONE_SCATTER, walk(700), octave_throb)
    return chirps + band(octave, 2000, 1200)  # the band keeps mainly the octaves of low chirps


def hum_and_knock():
    """Two short gliding tones: a low hum that rises briefly, then the dull knock."""
    return notes([BRIEF_LOW_HUM, DULL_KNOCK], [.01, .02], walk(20), 0.76)


def ports(x):
    """The phone body shades and delays the sound differently for each port."""
    hz = np.fft.rfftfreq(N, 1 / SR)
    # each port takes half the difference, in opposite directions
    half = undb(by_pitch(hz, PORT_TILT) / 2) * np.exp(.5j * by_pitch(hz, PORT_LEAD))
    return np.array([irfft(rfft(x) * g, N) for g in (half, 1 / half)])


def banks(x):
    """Echoes scattered by snow banks: a fading noise tail for each port, its path length drifting."""
    tail = rng.standard_normal((2, 6000)) * np.exp(-np.arange(6000) / (0.057 * SR))
    tail = tail / np.linalg.norm(tail[0])
    echoes = signal.fftconvolve(x[None], tail, axes=1)[:, :N]
    # read each echo slightly early or late, by a wandering number of samples
    return np.array([map_coordinates(e, [np.arange(N) + 60 * walk(1.5)], order=3) for e in echoes])


def scene():
    """The car at both ports, scattered sound from snow banks, and wind."""
    hum, gas_pulse = engine()
    tyre_noise = tyres()
    roar, wind = rumble()
    high = tyre_noise + turbo() + squeal()
    low = hum + roar * gas_pulse + hum_and_knock()
    pan_db = columns(TYRE_CURVE)[-1]
    swing_db = (pan_db - pan_db.mean()) / 2
    direct = ports(low) + ports(high) * undb([swing_db, -swing_db])
    # a copy of roughly 2 to 16 kHz is added, so the treble scatters more
    brighter = high + undb(DIFFUSE_TREBLE_DB) * band(high, 8950, 13700)
    scattered = undb(DIFFUSE_DB) * banks(brighter)
    # soft first and last 5 ms
    fade = np.clip(np.minimum(np.arange(N), N - np.arange(N)) / (.005 * SR), 0, 1)
    return (direct + scattered + wind) * fade


def record(dry):
    """The phone drops the deepest bass, rounds the loudest peaks and cuts the top."""
    x = signal.sosfilt(signal.butter(1, 25, "highpass", fs=SR, output="sos"), dry)
    rounded = 1.3 * np.tanh(x / 1.3)
    return signal.sosfilt(signal.ellip(14, .2, 70, TOP_HZ, fs=SR, output="sos"), rounded)


dry = scene()
out = record(dry)
transcribe(out)
```